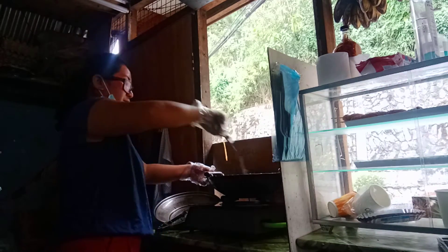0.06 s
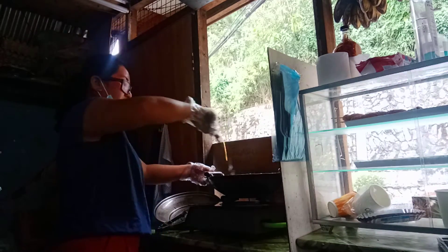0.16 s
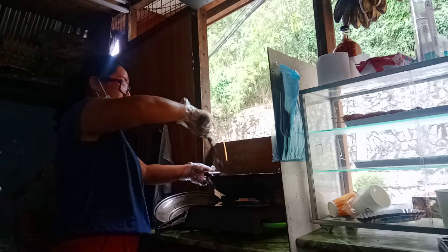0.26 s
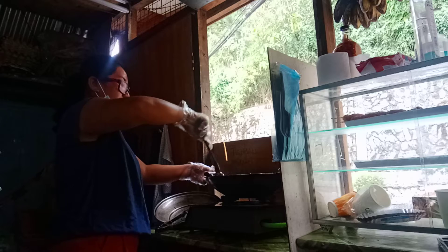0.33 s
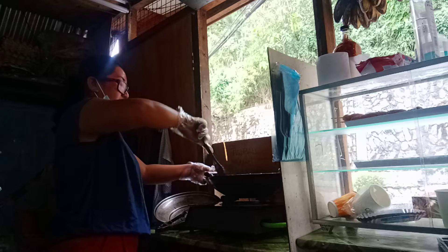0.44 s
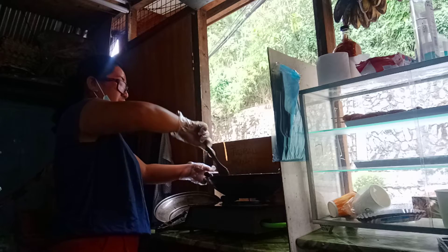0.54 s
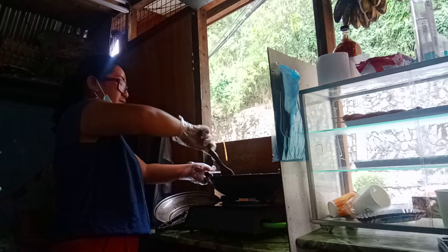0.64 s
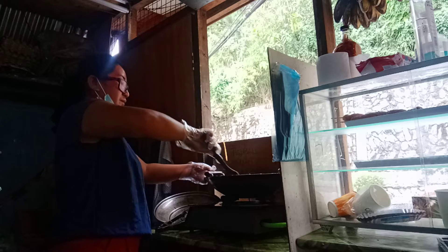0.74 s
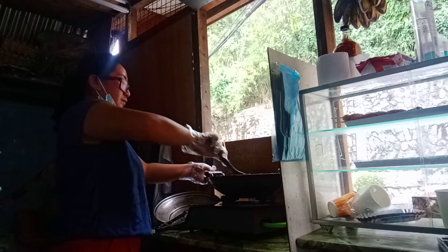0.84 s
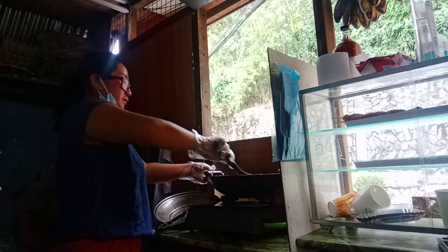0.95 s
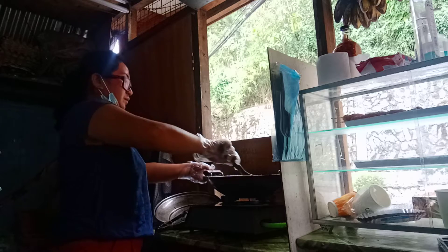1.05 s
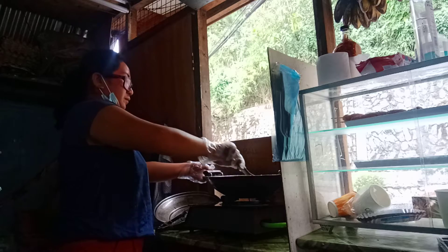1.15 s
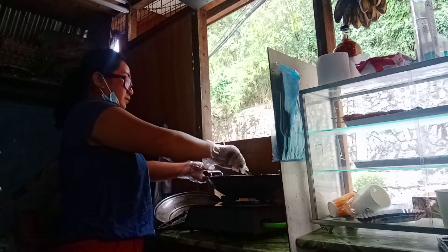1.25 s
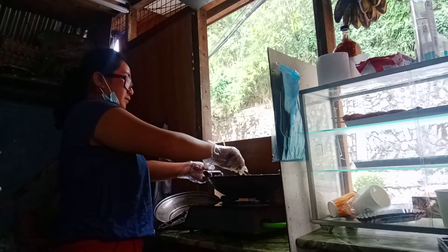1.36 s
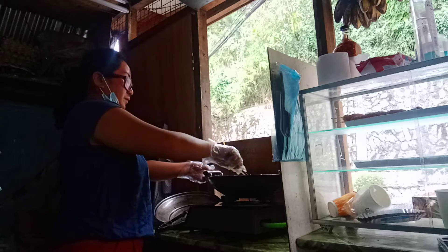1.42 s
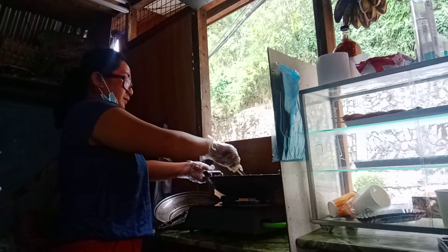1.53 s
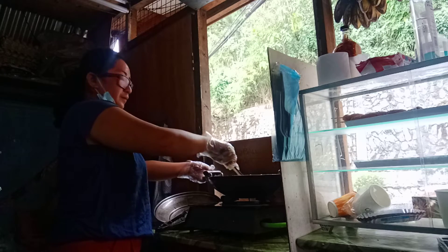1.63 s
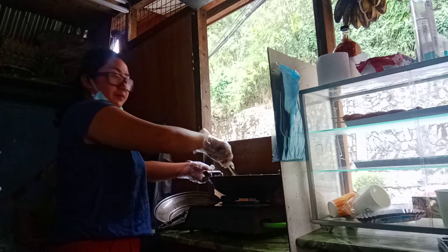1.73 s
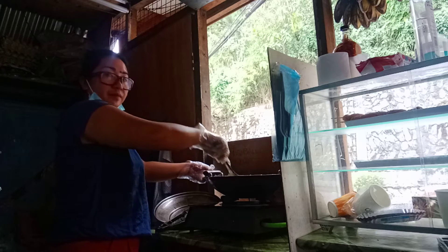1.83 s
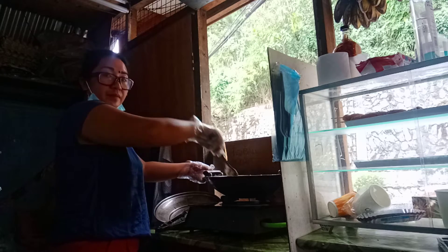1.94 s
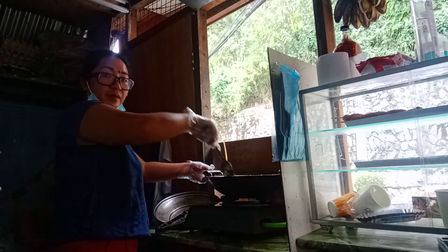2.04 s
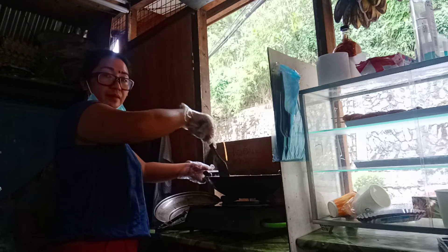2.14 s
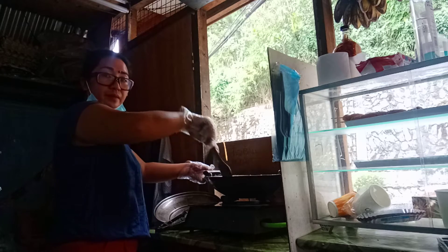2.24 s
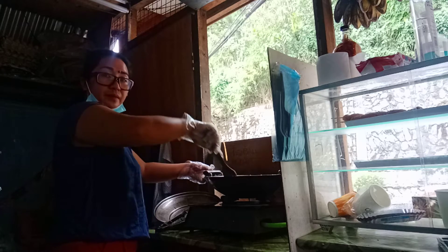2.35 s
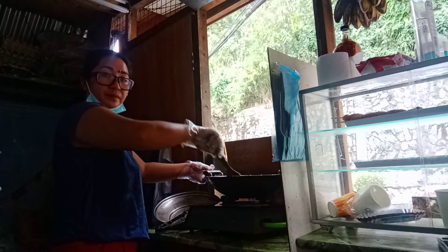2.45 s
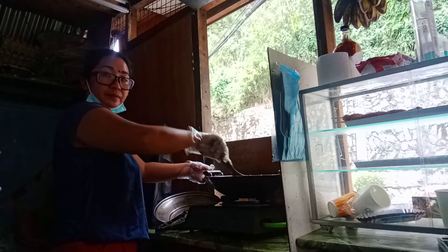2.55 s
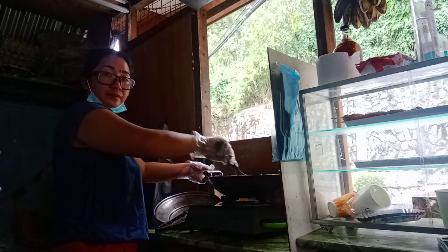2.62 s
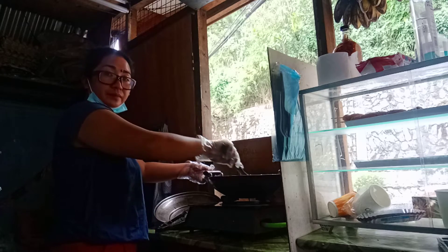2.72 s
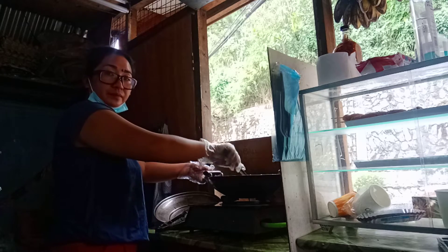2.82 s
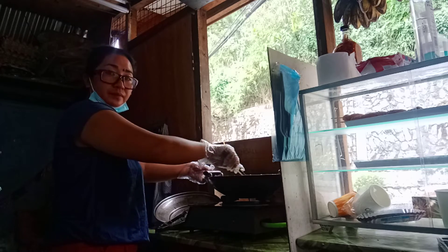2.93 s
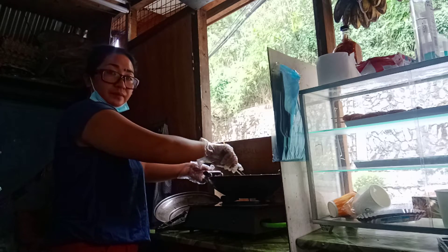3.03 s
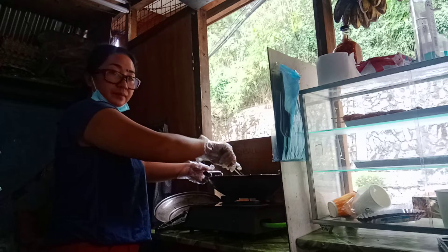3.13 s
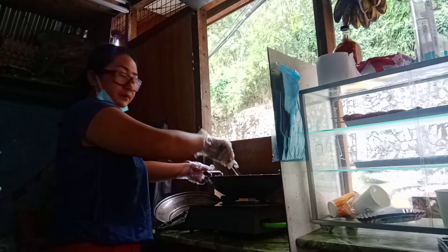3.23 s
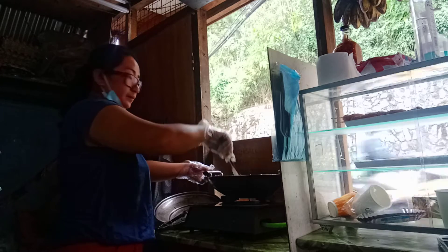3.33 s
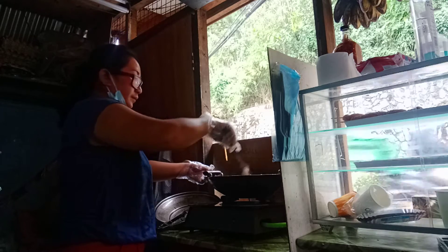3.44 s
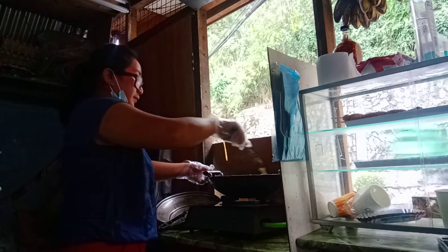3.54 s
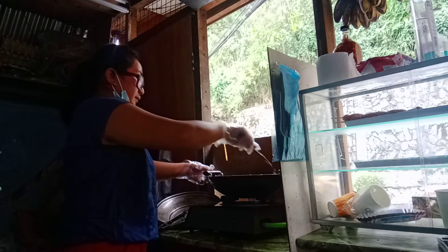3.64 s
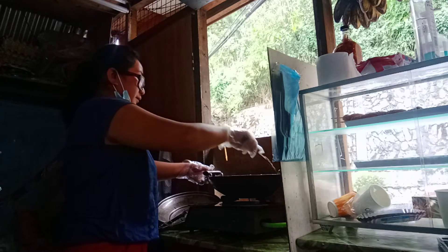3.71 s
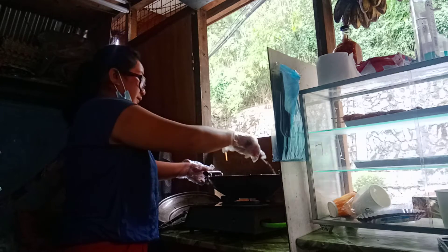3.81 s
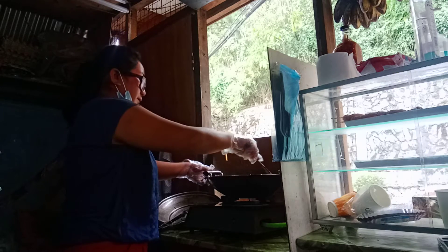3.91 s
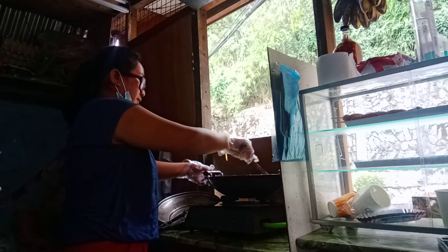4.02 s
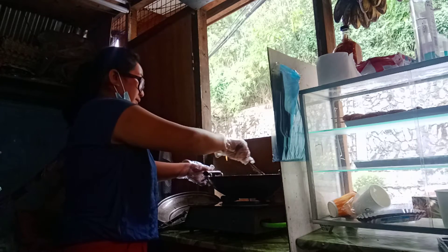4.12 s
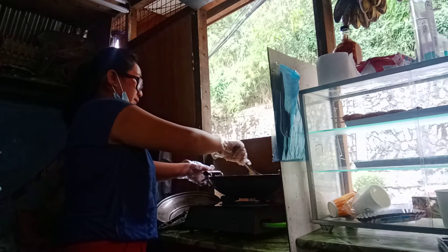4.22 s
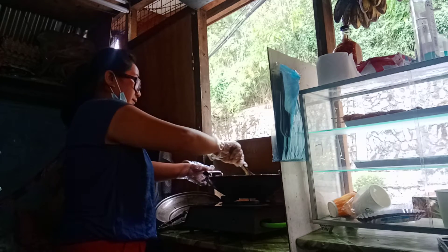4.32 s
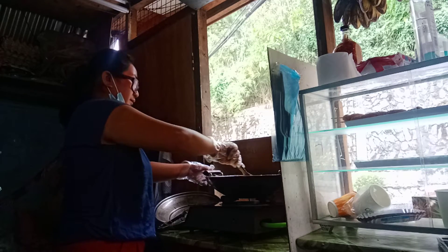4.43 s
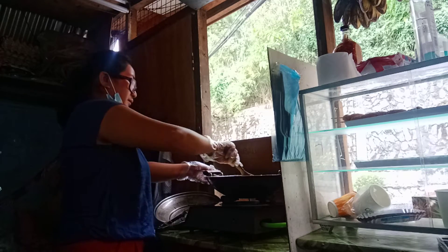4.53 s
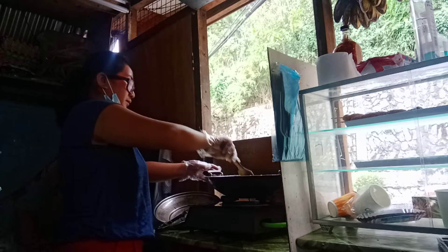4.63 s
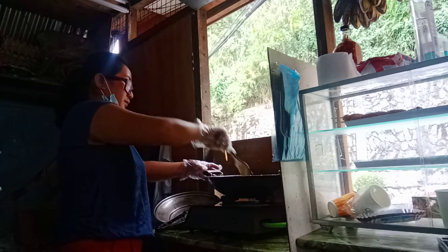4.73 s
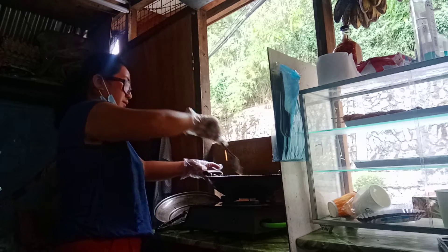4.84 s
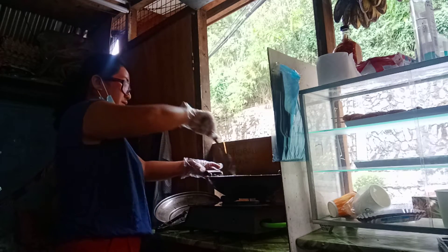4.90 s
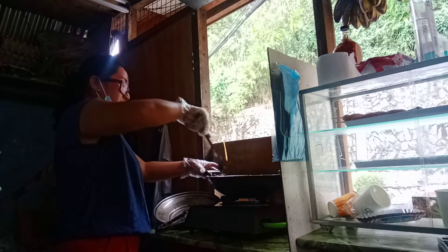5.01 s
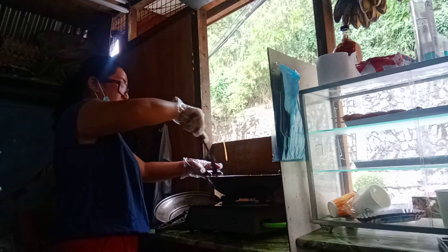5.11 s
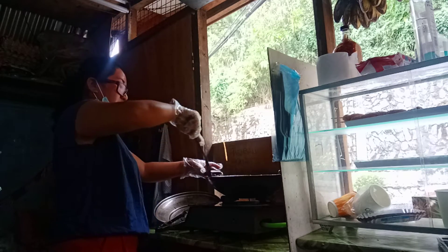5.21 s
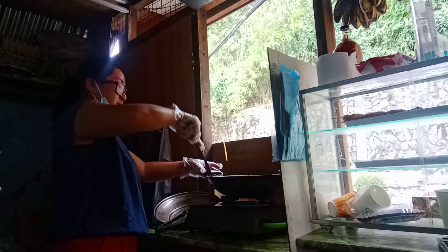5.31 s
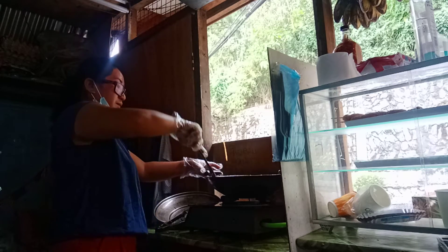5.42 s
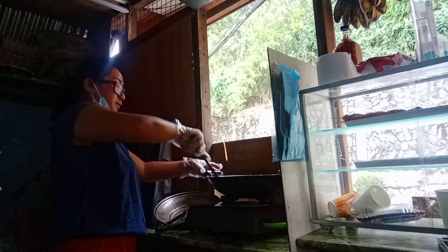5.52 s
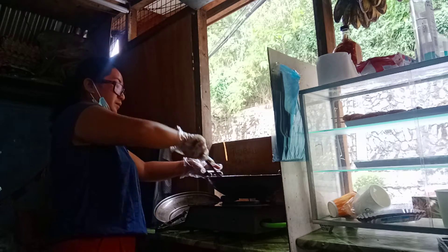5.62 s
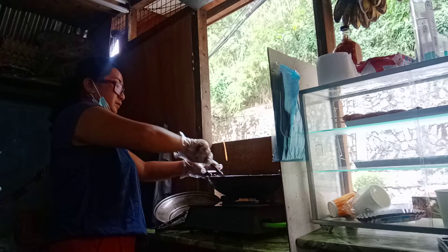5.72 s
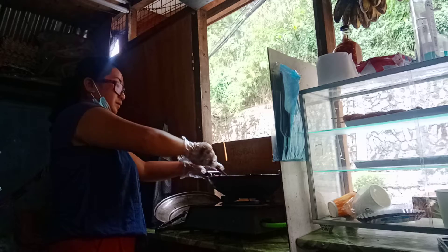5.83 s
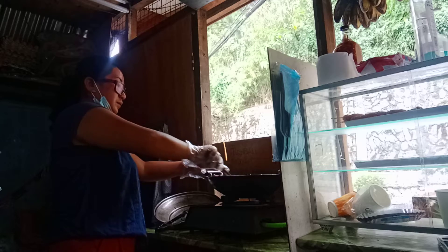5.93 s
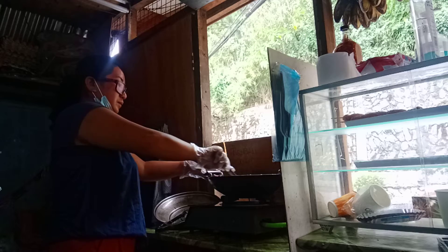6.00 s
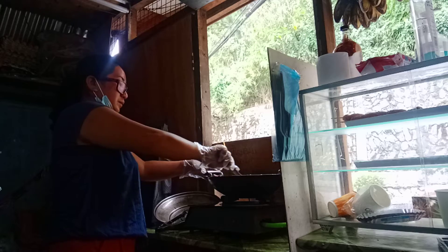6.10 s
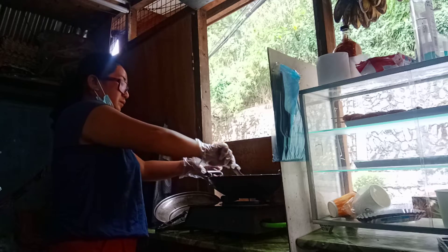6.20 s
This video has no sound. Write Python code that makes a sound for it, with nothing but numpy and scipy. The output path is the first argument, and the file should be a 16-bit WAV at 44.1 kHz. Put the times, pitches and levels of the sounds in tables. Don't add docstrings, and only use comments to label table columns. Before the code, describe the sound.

At an open wooden roadside stall, a utensil faintly ticks and scrapes in a pan while a distant engine drones away with a thin fan whine. A slow single-cylinder motorcycle approaches, its separate low booms swelling until it passes close with rattling metal. The throttle snaps shut, the pipe barks and thuds, the engine stumbles and pulls away. One fixed phone-like microphone, mono, with a brief wind buffet at the start.

```python
import sys
import numpy as np
from scipy import signal
from scipy.fft import rfft, irfft, next_fast_len
from scipy.io import wavfile
from scipy.ndimage import uniform_filter1d

SR = 44100
rng = np.random.default_rng(int(sys.argv[2]) if len(sys.argv) > 2 else 0)


def volts_from_decibels(level):
    exponent = np.asarray(level, float) / 20
    return 10 ** exponent


def store_wav(level_fs):
    pcm = np.round(np.clip(np.atleast_2d(level_fs), -1, 1) * 32767)
    wavfile.write(sys.argv[1], SR, pcm.T.astype(np.int16))


N = 276066
TIME = np.arange(N) / SR


def level(x, db):
    return x * volts_from_decibels(db) / np.sqrt(np.mean(x ** 2))


def curves(table):
    s, *columns = np.transpose(table)
    return [np.interp(TIME, s, c) for c in columns]


def slope(hz, points):
    f, db = np.transpose(points)
    return np.interp(np.log(hz), np.log(f), db)


def walk(rate_hz):
    hold = int(SR / rate_hz)
    held = np.repeat(rng.standard_normal(N // hold + 1), hold)
    return uniform_filter1d(uniform_filter1d(held, hold), hold)[:N] * 4 / 3


def band(hz, width_hz, size=N):
    b, a = signal.iirpeak(hz, hz / width_hz, SR)
    once = signal.lfilter(b, a, rng.standard_normal(size))
    return level(signal.lfilter(b, a, once), 0)


def wash(points, flicker_db, rate_hz):
    size = next_fast_len(N)
    hz = np.maximum(np.arange(size // 2 + 1) * SR / size, 1)
    low_hz, high_hz = points[0][0], points[-1][0]
    full = rfft(rng.standard_normal(size)) * volts_from_decibels(slope(hz, points)) * (hz > low_hz)
    out = 0
    for octave in np.arange(np.floor(np.log2(low_hz)), np.log2(high_hz) + .5, .5):
        strip = np.clip(1 - 2 * np.abs(np.log2(hz) - octave), 0, 1) * (hz < high_hz)
        out = out + irfft(full * strip, size)[:N] * volts_from_decibels(flicker_db * walk(rate_hz))
    return level(out, 0)


def grains(rows):
    out = np.zeros(N + SR)
    for s, db, hz, width_hz, length_s in rows:
        age = np.arange(SR // 6) / SR / np.clip(length_s, .005, .07)
        burst = band(hz, width_hz, size=len(age)) * 8 * age * np.exp(-3 * age)
        out[int(s * SR):][:len(age)] += volts_from_decibels(db) * burst
    return out[:N]


def nearness(late_s=0):
    # (time [s], level [dB])
    near = [(0, -25), (1.901, -18), (2.4, -13), (2.999, -7), (3.301, -3), (3.599, -0.5), (3.75, -3.5),
            (3.93, -4), (4.06, -9), (4.2, -12), (4.4, -13.5), (4.601, -20.5), (5.4, -26), (6.26, -27.5)]
    s, db = np.transpose(near)
    return np.interp(TIME - late_s, s, db)


def passing(db, steep, leaving_db, late_s=0):
    leaving_db_per_s = 7
    bike_power = volts_from_decibels(2 * (db + steep * nearness(late_s)))
    leaving_power = volts_from_decibels(2 * (leaving_db - leaving_db_per_s * TIME))
    return 10 * np.log10(bike_power + leaving_power)


def street():
    # (frequency [Hz], density [dB per Hz])
    rumble_colour = [(20, -9.5), (38, -18.5), (50, -9), (65, -9.5), (110, 1), (190, -3), (260, -10.5),
                     (350, -24.5)]
    # (frequency [Hz], density [dB per Hz])
    hush_colour = [(300, -1), (450, -9), (650, -18.5), (1000, -13), (1400, -20), (2200, -22), (5000, -25),
                   (7200, -31), (11000, -32.5), (15000, -31), (16500, -25)]
    rumble_db = passing(-38.5, steep=.35, leaving_db=-39.5, late_s=.47)
    rumble = volts_from_decibels(rumble_db + 4.5) * wash(rumble_colour, flicker_db=-1.5, rate_hz=9.2)
    return rumble + level(wash(hush_colour, flicker_db=1.1, rate_hz=24), -63)


def wind():
    ends_s, fade_s = 0.3, 0.034
    gust = volts_from_decibels(-46 + 1.7 * walk(11)) * band(52, 35)
    return gust * np.clip((ends_s - TIME) / fade_s, 0, 1)


def far_engine():
    # (time [s], firing rate [Hz], level [dB])
    drone = [(0, 54.65, -39), (.2, 54.55, -33), (.35, 53.75, -34), (.55, 54.25, -31), (.7, 54.95, -31),
             (.9, 54.95, -32.5), (1.15, 54.95, -37), (1.35, 53.95, -39), (1.5, 54.95, -37),
             (1.8, 54.75, -42), (2.0, 54.45, -42), (2.2, 54.65, -40), (2.5, 54.65, -44), (2.9, 53.97, -42),
             (3.5, 54.15, -50), (6.26, 57.9, -82)]
    drone_db = [-21.5, 4, -17, -10.5, -25, -25, -33, -30]
    # (time [s], frequency [Hz], level [dB])
    fan_tone = [(0, 264, -48), (.5, 262.7, -71.5), (.8, 260.2, -40), (1.2, 263.3, -56), (2.1, 262.9, -50),
                (2.3, 261.4, -43.5), (2.7, 260.1, -42.5), (3.0, 260.3, -44), (3.3, 261, -54.5),
                (6.26, 250, -59.5)]
    # (frequency [quarters of the blade tone], level [dB])
    motor = [(5, -56.5), (5.9, -62), (8, -70.5)]
    start_turns, motor_fades_s, motor_fade_db_per_s = -.17, 3.0, 11

    hz, db = curves(drone)
    turns = np.cumsum(hz) / SR + start_turns
    stack = 0
    for k, rel_db in enumerate(drone_db, 1):
        gain = volts_from_decibels(rel_db + .08 * k * k * walk(14))
        stack = stack + gain * np.sin(2 * np.pi * k * turns + .035 * k * k * walk(13))

    fan_hz, fan_db = curves(fan_tone)
    blades = 2 * np.pi * np.cumsum(fan_hz) / SR + .7 * walk(12)
    fan = volts_from_decibels(fan_db - 1.5 + 2.0 * walk(14)) * np.sin(blades)
    fade_db = motor_fade_db_per_s * np.maximum(TIME - motor_fades_s, 0)
    for quarters, rel_db in motor:
        gain = volts_from_decibels(rel_db - fade_db + 3.6 * walk(11))
        fan = fan + gain * np.sin(quarters * blades / 4 + .7 * walk(16))
    return np.sqrt(2) * (volts_from_decibels(db) * stack + fan)


def firing_turns():
    # (time [s], rate [Hz])
    firing = [(0.0, 22.04), (0.605, 23.68), (1.124, 24.01), (1.944, 24.16), (2.566, 23.7), (3.009, 23.61),
              (3.315, 22.87), (4.034, 21.88), (4.07, 20.2), (4.19, 18.9), (4.285, 17.5), (4.34, 20.4),
              (4.4, 20.6), (4.44, 22.3), (4.49, 21.0), (4.6, 19.5), (4.748, 17.4), (4.857, 16.4),
              (5.061, 13.2), (5.407, 18.6), (5.544, 17.34), (5.638, 19.61), (6.107, 23.52)]
    firing_at_s = 3.3342
    hz, = curves(firing)
    turns = np.cumsum(hz) / SR
    return hz, turns - turns[int(firing_at_s * SR)]


def exhaust(hz, turns):
    # (time [s], level [dB], tilt [dB per octave], wall echo lag [ms])
    boom_path = [(0.0, -46, -13, 13), (0.39, -48.5, 41, 16.4), (0.64, -45.5, 29, 11.8),
                 (1.13, -37, 13.5, 14.8), (1.37, -36.5, 5, 16.5), (1.66, -35, 5, 20.6),
                 (2.28, -35.5, 19, 18.5), (2.44, -34, 6, 19.4), (2.89, -26, 4, 20.6),
                 (3.35, -26.5, 2.5, 21.95), (3.63, -25.5, 5.5, 18.8), (3.95, -27.5, -1, 19.1),
                 (4.18, -31, -8.5, 20.7), (4.27, -32.5, -4, 22.6), (4.35, -25.5, 0, 18),
                 (4.45, -31, -0.5, 17.5), (4.56, -33, -5.5, 18.5), (4.68, -37.5, -7.5, 23),
                 (4.78, -42, 0.5, 18), (4.88, -41, 3, 17.5), (4.99, -45.5, -6, 25), (5.23, -37, -8, 16.6),
                 (5.42, -37, -6, 20), (5.58, -38, 3, 21.8), (5.7, -37.5, -2, 16.8), (5.9, -38, -4, 16),
                 (6.26, -36, 5, 17.6)]
    # (frequency [Hz], gain [dB])
    under = [(25, -44), (50, -32), (68, -19.5), (85, -4), (100, 0)]
    over = [(120, 0.5), (143, -3), (155, -20), (175, -26), (230, -26), (275, -32), (330, -41.5)]
    # (time [s], bass lift [dB])
    shut = [
        (4.03, 7.5),
        (4.3, -5.5),
        (4.44, 11.5),
        (4.6, 5),
        (4.74, 3),
        (5.42, 6),
    ]
    # (time [s], strength [dB], length [s])
    stumble = [
        (4.672, 6, 0.016),
        (4.757, -4, 0.02),
        (4.853, 6.5, 0.036),
        (5.04, 1, 0.021),
        (5.165, 0, 0.035),
        (5.504, -4.5, 0.075),
        (5.655, 2.5, 0.12),
    ]
    # (time [s], 4th overtone [turns], 5th overtone [turns])
    echo_turn = [(0, .3, -.65), (1.0, .3, -.55), (1.2, .3, -.38), (1.4, .25, -.2), (1.65, .12, -.15),
                 (1.8, .03, -.06), (2.0, 0, 0), (6.26, 0, 0)]
    wall_gain, boom_centre_hz, shut_fade_s, shut_below_hz = 0.39, 115.2, 0.37, 88
    tail_from_s, tail_grows_s, tail_fades_s, tail_share = 4.43, 0.43, 0.5, 0.29

    level_db, tilt_db, lag_ms = curves(boom_path)
    for s, db, length_s in stumble:
        level_db = level_db + db * np.exp(-((TIME - s) / length_s) ** 2)
    thud_db = np.zeros(N)
    for s, db in shut:
        thud_db += db * np.exp(-np.maximum(TIME - s, 0) / shut_fade_s) * (TIME > s)
    thud_db = uniform_filter1d(thud_db, size=800)

    turned = dict(zip((4, 5), curves(echo_turn)))
    boom = 0
    for k in range(2, 16):
        f = k * hz
        db = level_db + tilt_db * np.log2(np.clip(f, 60, 160) / boom_centre_hz)
        db = db + slope(f, under) + slope(f, over)
        db = db + thud_db * np.clip((shut_below_hz - f) / 10, 0, 1) + .7 * walk(12)
        comb = np.sqrt(1 + wall_gain ** 2 + 2 * wall_gain * np.cos(2 * np.pi * f * lag_ms / 1000))
        drift = (.1 + .7 * np.clip((f - 150) / 30, 0, 1)) * walk(9)
        phase = 2 * np.pi * (k * turns + turned.get(k, 0)) - 1.3 + drift
        boom = boom + np.sqrt(2) * volts_from_decibels(db) * comb * np.cos(phase)

    grow = np.clip((TIME - tail_from_s) / tail_grows_s, 0, 1)
    fade = np.exp(-np.maximum(TIME - tail_from_s - tail_grows_s, 0) / tail_fades_s)
    return boom + tail_share * grow * fade * np.interp(TIME - .021, TIME, boom)


def engine_case(roar_db):
    # (frequency [Hz], width [Hz], level [dB])
    case_rings = [(645, 54, -7.5), (783, 250, -7), (936, 110, -1), (1082, 120, -3), (1201, 130, -2.5),
                  (1384, 240, -6.5), (1680, 450, -9.5)]
    # (time [s], pitch ratio [1])
    case_pitch = [(0, 1.02), (2.7, 1.02), (3.1, .97), (3.9, 1.03), (4.3, .86), (4.55, .86), (4.75, 1.0),
                  (6.26, 1.0)]
    case = sum(volts_from_decibels(db + 2.2 * walk(24) + .7 * walk(6)) * band(f, w) for f, w, db in case_rings)
    case = np.interp(np.cumsum(curves(case_pitch)[0]) / SR, TIME, case)
    return volts_from_decibels(roar_db) * level(case, 0)


def shield_rattle(rattle_db):
    # (frequency [Hz], width [Hz], level [dB])
    rattle_rings = [(1854, 500, 2), (2600, 1000, 0.5), (2840, 450, -13.5), (3250, 300, -10.5),
                    (3680, 2800, -4)]
    faces_s, span_s = 3.63, 0.3
    rattle = sum(volts_from_decibels(db + 1.7 * walk(26)) * band(f, w) for f, w, db in rattle_rings)
    whistle_db = -10 - 13 * ((TIME - faces_s) / span_s) ** 4 + 2.0 * walk(30)
    return volts_from_decibels(rattle_db) * (level(rattle, 0) + volts_from_decibels(whistle_db) * band(3295, 95))


def road_bounce(body):
    closest_s = 3.6
    hz_per_db = np.where(TIME < closest_s, 8, 13)
    spacing_hz = 620 - hz_per_db * np.maximum(nearness(), -14)
    return body + .25 * np.interp(TIME - 1 / spacing_hz, TIME, body)


def motorcycle():
    hz, turns = firing_turns()
    puff = volts_from_decibels(1.0 * np.cos(2 * np.pi * turns - .5) + .6 * walk(12))
    roar_db = passing(-44.5, steep=1, leaving_db=-58)
    rattle_db = passing(-59.5, steep=1.15, leaving_db=-70.5, late_s=.041)
    body = road_bounce(puff * (engine_case(roar_db) + shield_rattle(rattle_db)))

    pipe = puff * volts_from_decibels(-53 + 1.1 * nearness() + 2.0 * walk(15)) * band(400, 88)
    hiss_at_s, hiss_span_s = 4.19, .2
    hiss_db = -63 - ((TIME - hiss_at_s) / hiss_span_s) ** 2 * 6
    hiss = volts_from_decibels(hiss_db + 2.5 * walk(35)) * band(1600, 700)
    tyre_db = passing(-45.5, steep=.75, leaving_db=-44, late_s=.27)
    tyre_colour = [(290, 0), (420, -6), (530, -8), (620, -14)]  # (Hz, dB)
    tyres = volts_from_decibels(tyre_db - 5.5) * wash(tyre_colour, flicker_db=1.5, rate_hz=13)
    chain = volts_from_decibels(-77.5 + .44 * nearness()) * puff * band(13000, 5000)
    return exhaust(hz, turns) + body + pipe + hiss + tyres + chain


def utensil():
    # (time [s], peak [dB], ring [Hz], width [Hz], length [s])
    touch = [(.12, -71, 724, 61.3, 0.037), (.78, -52.5, 703, 60, 0.046), (1.418, -52, 1217, 202, 0.041),
             (1.468, -74, 560, 59.6, .04), (2.063, -65, 4112, 1516, 0.074), (2.612, -65, 3207, 1469, 0.037),
             (3.963, -59, 3170, 1980, 0.017), (4.243, -58, 3410, 2030, 0.024),
             (4.853, -54, 1090, 500, 0.036), (4.858, -60, 2390, 1980, 0.026), (4.864, -51, 500, 700, 0.054),
             (4.94, -68, 2600, 1500, 0.016), (5.279, -60.5, 2050, 116.8, 0.028),
             (5.325, -63, 2070, 200, 0.036), (5.365, -62.5, 2040, 150, 0.031),
             (5.395, -69, 2033, 119.3, .02), (5.598, -59.5, 3530, 598, 0.039),
             (5.608, -67, 3970, 249.7, .025), (5.644, -68, 2700, 150, 0.03), (5.663, -69, 2030, 120, .02),
             (5.84, -67, 4580, 200, 0.014), (5.935, -65, 2515, 240, 0.033),
             (6.066, -71, 3560, 122.7, 0.055)]
    # (time [s], peak [dB], ring [Hz])
    shove = [(0.80, -45.5, 426), (1.019, -45.5, 460), (1.248, -46.5, 440), (1.48, -52, 514),
             (1.67, -47, 456), (2.02, -40, 320), (2.311, -43, 400), (5.037, -49.5, 420), (1.44, -40.5, 340),
             (4.72, -46, 400), (5.659, -58, 380), (2.56, -45.5, 388)]
    width_hz, length_s = 200, .07
    shoves = [(s - length_s / 5, db - 4, hz, width_hz, length_s) for s, db, hz in shove]
    return grains([*touch, *shoves]) * volts_from_decibels(1.5 * walk(120) - 5.0)


def bark():
    # (time [s], level [dB])
    bark_level = [(0, -68), (2.0, -57), (2.7, -55.5), (3.6, -59), (4.15, -54), (4.35, -39.5), (4.5, -48.5),
                  (4.75, -47.5), (5.3, -52.5), (5.7, -55.5), (6.26, -65)]
    # (frequency [Hz], width [Hz], level [dB])
    bark_rings = [(270, 370, 1.5), (500, 1200, -7.5), (1500, 1200, -16)]
    # (time [s], peak [dB], ring [Hz], length [s])
    chatter = [(3.105, -62.5, 2798, 0.014), (3.149, -64, 3358, 0.044), (3.302, -70, 3140, 0.024),
               (3.374, -64, 2800, 0.017), (3.399, -59.5, 2850, 0.013), (3.439, -63, 3310, 0.063),
               (3.482, -65, 3260, .035), (3.529, -61, 2556, .02), (3.57, -65.5, 3300, 0.016),
               (3.613, -58.5, 2600, .02), (3.645, -64, 3326, .025), (3.675, -56, 2500, 0.019),
               (3.693, -64, 3250, .02), (3.723, -58.5, 3250, 0.023), (3.764, -63.5, 3316, 0.027),
               (3.796, -60, 2840, 0.027), (3.815, -61, 3270, 0.031), (3.856, -63, 2794, 0.019),
               (3.898, -56, 2800, 0.014), (3.939, -58.5, 2882, 0.014), (3.981, -59, 3250, 0.0082),
               (4.007, -67, 3700, .02), (4.047, -56, 1350, 0.021), (4.094, -55, 1500, 0.015),
               (4.14, -48.5, 1484, 0.02), (4.195, -62, 1545, 0.017), (4.25, -62, 1650, .015),
               (4.295, -56.5, 1500, .02), (4.352, -63, 1600, .015), (4.40, -65, 1800, .015),
               (4.45, -70, 1500, 0.017), (4.51, -68, 2000, 0.024)]
    depth_db, chatter_width_hz = 7, 190
    db, = curves(bark_level)
    turns = firing_turns()[1]
    gate = volts_from_decibels(db + depth_db * (np.cos(2 * np.pi * turns) - 2.5) + 4.0 * walk(41))
    gas = sum(volts_from_decibels(rel_db) * band(hz, width_hz) for hz, width_hz, rel_db in bark_rings)
    rows = [(s, peak_db, hz, chatter_width_hz, length_s) for s, peak_db, hz, length_s in chatter]
    return gate * gas + grains(rows)


def scene():
    mix = street() + wind() + far_engine() + motorcycle() + utensil() + bark()
    return mix[None] * np.clip(.5 + TIME / .01, 0, 1)


def top_cut(x):
    return signal.sosfilt(signal.butter(12, 15504, fs=SR, output="sos"), x)


def record(dry):
    return top_cut(dry)


dry = scene()
out = record(dry)
store_wav(out)
```